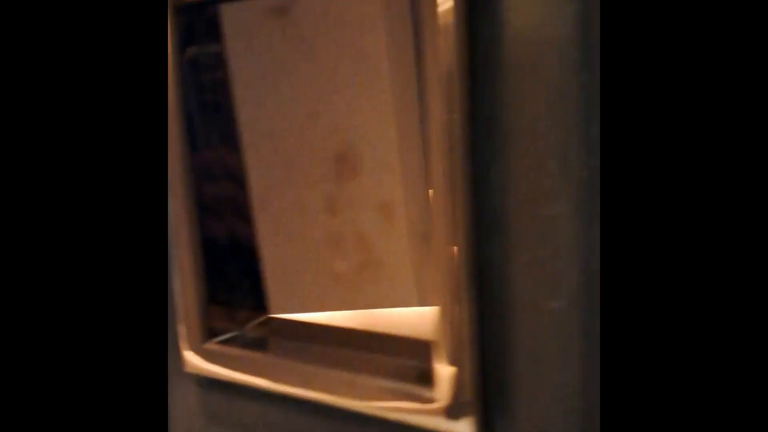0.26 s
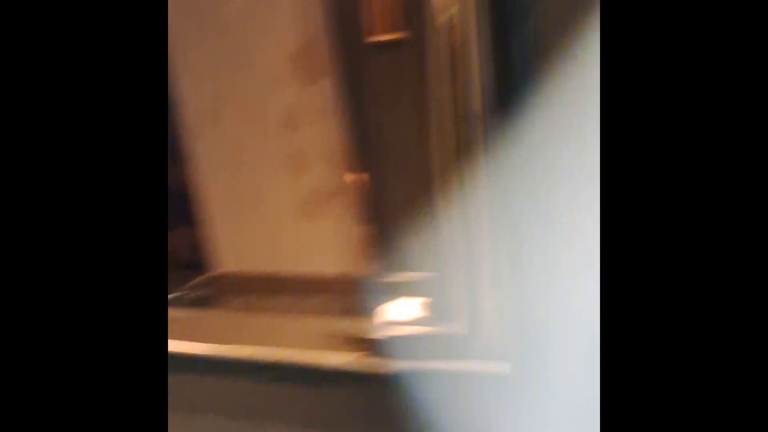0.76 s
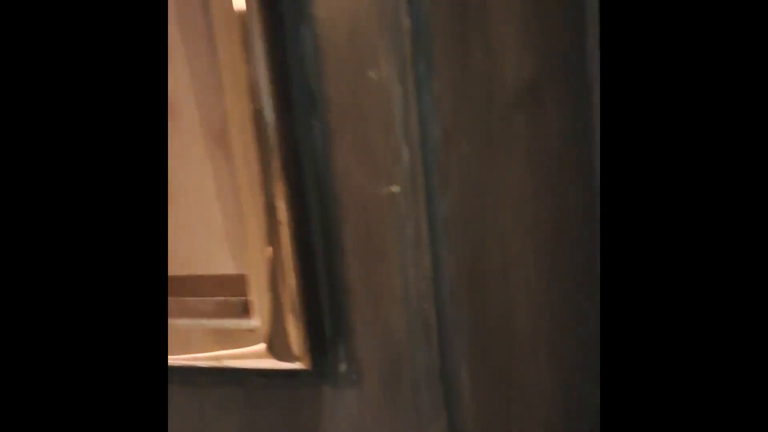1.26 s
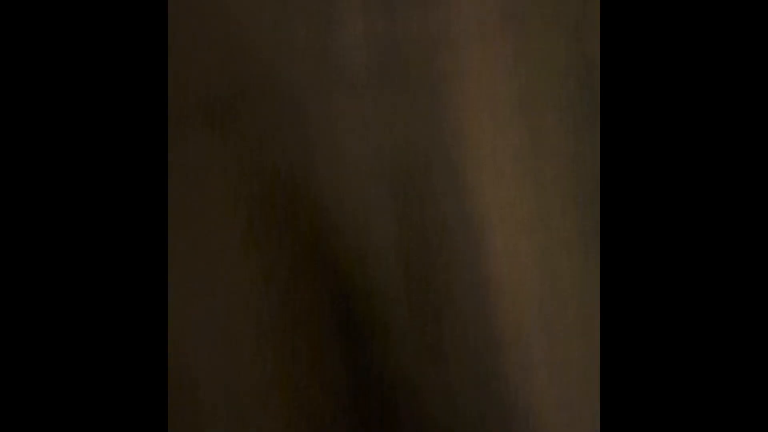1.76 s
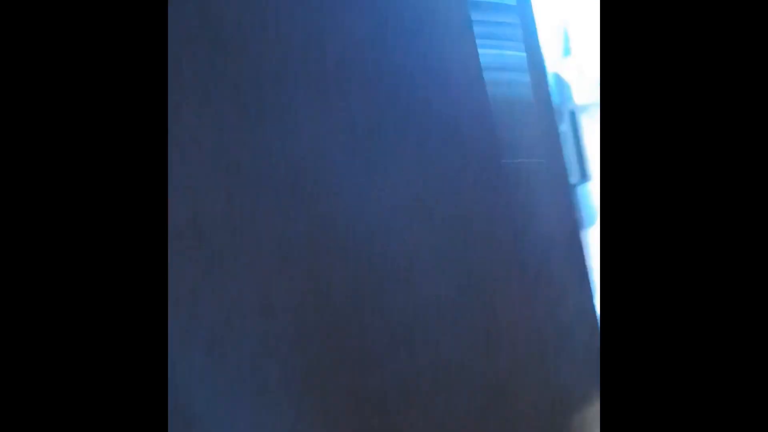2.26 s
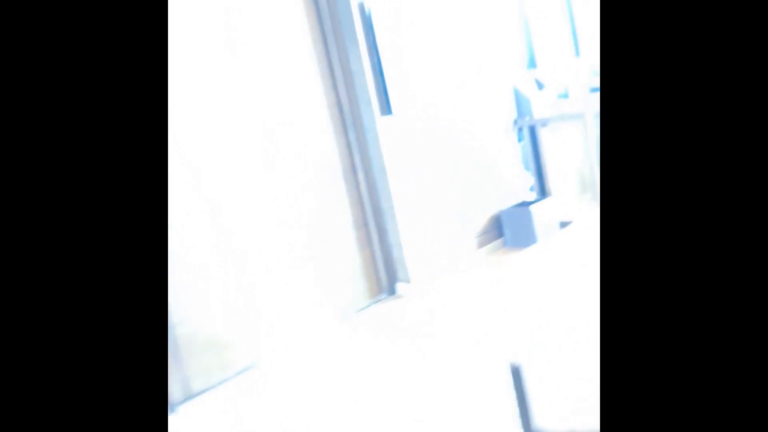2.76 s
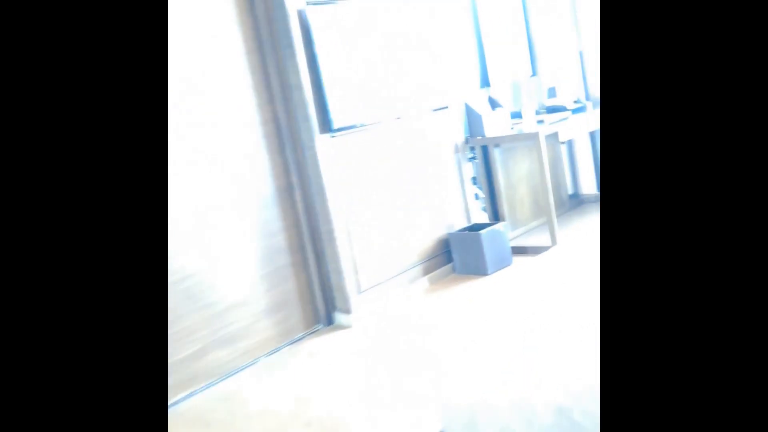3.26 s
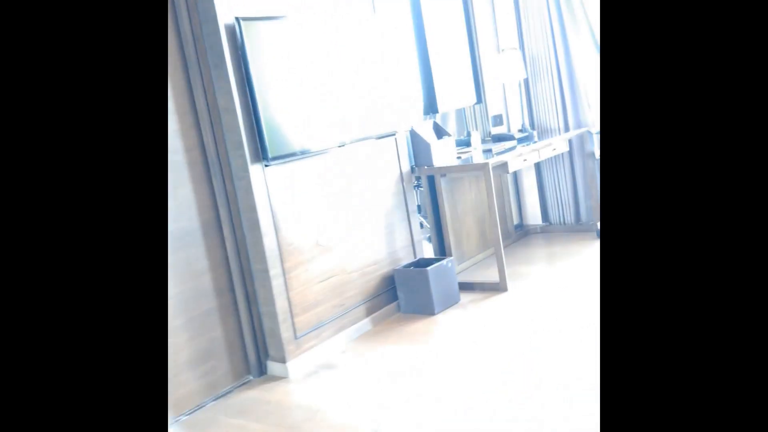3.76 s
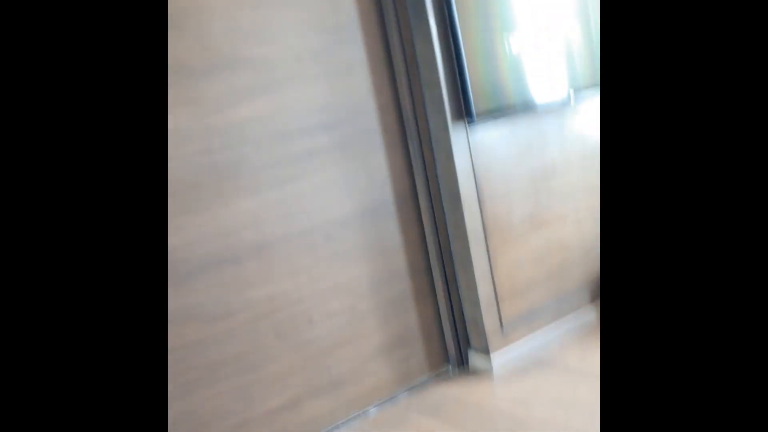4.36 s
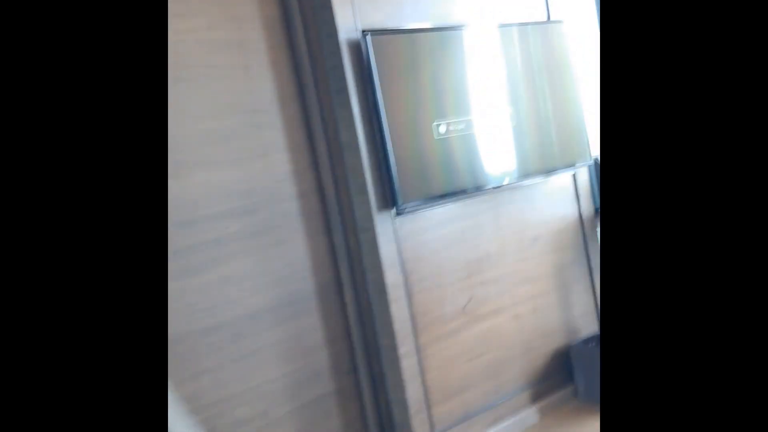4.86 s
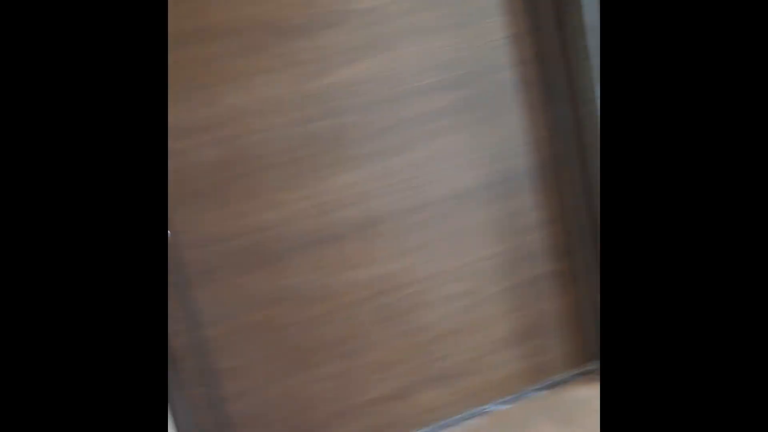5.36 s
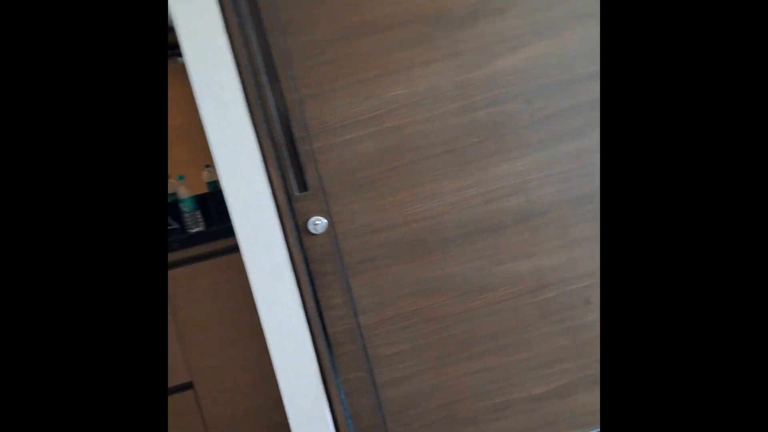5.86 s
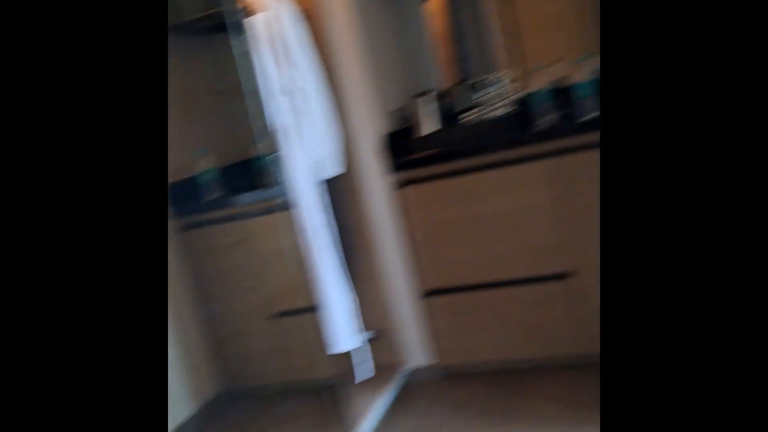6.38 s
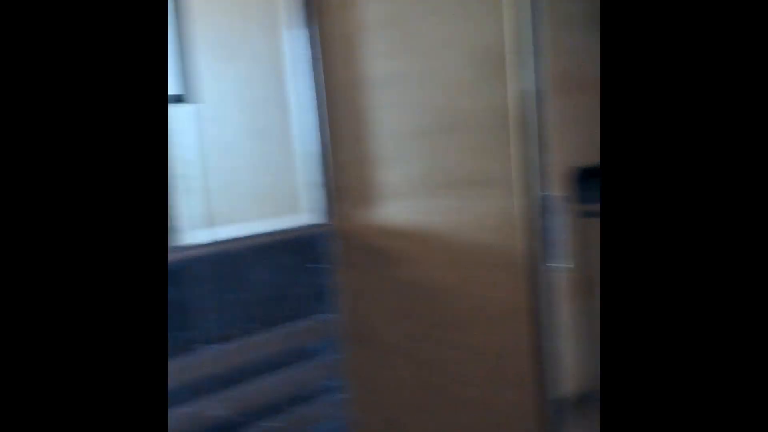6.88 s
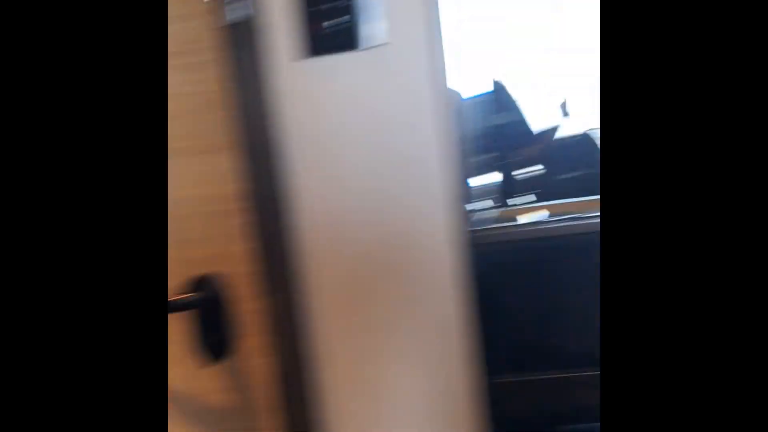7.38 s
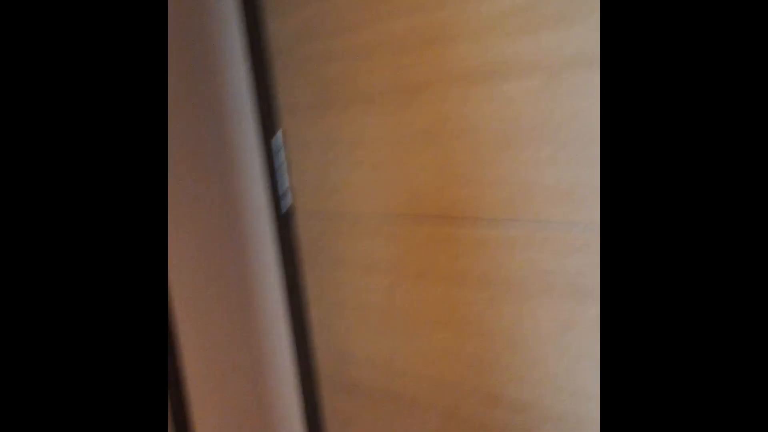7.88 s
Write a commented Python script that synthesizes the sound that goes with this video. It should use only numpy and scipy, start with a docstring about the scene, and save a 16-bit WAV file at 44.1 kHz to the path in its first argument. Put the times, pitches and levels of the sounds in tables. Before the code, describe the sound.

Close to the microphone, a wooden cupboard door taps, then bumps its frame in a fast rattling cluster with a small metallic ping. Hollow knocks and short glides follow, then a latch clack amid low wind buffets. Soft soles scuff and step on a wooden floor. Farther off, a large door rumbles along its track and slams in several hard, ringing clacks. Quiet room, low ventilation hum, moderate reverberation.

```python
"""Wooden cupboard doors slide and shut in a quiet room, heard from a camera carried by someone walking.
A near door glides, rattles and bumps home; a large one rolls along its track and clacks against its stop.
Soft soles scuff the floor, and moving air buffets the camera's two microphone ports.
Rubs and gusts are shaped noise that swells, holds and dies away; blows are short noise bursts,
thuds and ringing modes, with more room sound the farther off they are."""
import sys
import numpy as np
from scipy import signal
from scipy.fft import rfft, irfft, next_fast_len
from scipy.io import wavfile
from scipy.ndimage import uniform_filter1d

SR = 44100
rng = np.random.default_rng(int(sys.argv[2]) if len(sys.argv) > 2 else 0)


def master(y):
    """Save y as 16-bit WAV."""
    cut = np.clip(np.atleast_2d(y).T, -1, 1)
    pcm = np.round(cut * 32767)  # scale
    wavfile.write(sys.argv[1], SR, pcm.astype(np.int16))


N = 358533  # samples
RING_SIZE = 24576  # samples for a blow to die away
RIGHT_LAG = 735  # samples by which the right channel is late
EDGE_HZ = 16050  # upper band limit

# Ventilation noise as the camera moves about [t/s, level/dB], and its spectrum [f/Hz, dB per Hz]
VENT_LEVEL = [(0, -58.5), (.8, -67.5), (2.3, -55.5), (7.6, -56), (8.13, -59.5)]
VENT_SPECTRUM = [(56, -39.5), (95, -15), (126, -3), (156, -7.5), (185, -5.5), (260, -13.5), (296, -6.5),
                 (383, -14), (417, -11), (588, -18), (729, -27.5), (865, -26.5), (3130, -42),
                 (16000, -43.5)]
# Deep building rumble [t/s, level/dB], and its spectrum [f/Hz, dB per Hz]
RUMBLE_LEVEL = [(0, -62.5), (2, -54), (4.2, -64), (7.75, -61.5), (7.9, -79)]
RUMBLE_SPECTRUM = [(15, -38), (35, -17), (58, -11.5), (80, -11), (130, -23), (400, -62.5)]
# Room decay [f/Hz, t60/s]
ROOM_DECAY = [(60, 0.62), (250, 0.49), (700, 0.46), (2000, 0.44), (5000, 0.44), (7700, 0.42), (10000, 0.42),
              (16000, .34)]
# Likeness of diffuse sound at the two ports [f/Hz, left-right likeness]
PORT_LIKENESS = [(50, 0.65), (220, 0.9), (450, 0.79), (850, 0.14), (1500, 0.0067)]
# Colour of the ports [f/Hz, L-R level/dB]
PORT_BALANCE = [(50, -1.5), (250, 0.5), (550, -0.5), (1200, -5), (2300, -3.5), (4500, -1), (8000, -2.5),
                (13000, -1)]
# From the camera to what is struck [t/s, distance/m]
STRIKE_DISTANCE = [(.4, 0.93), (1.85, 0.39), (2.8, 1.24), (4.5, 1.8), (7.1, 2.8)]

# Air on the ports [t/s at full strength, hold/s, level/dB, L-R level/dB, gain of the deep part/dB]
GUST_TIMES = [(2.479, 0.036, -21, 38, -7), (2.6, 0.031, -29.5, 21, 3), (2.68, 0.075, -25.5, -2, -5.5),
              (2.806, 0.082, -32.5, -4, -3), (3.133, 0.026, -37, -7, 2.5), (3.274, 0.037, -38.5, 1.5, 2),
              (3.339, 0.042, -22, -12.5, -26), (3.473, 0.11, -30.5, -2.5, -2.5),
              (3.654, 0.035, -45, -17, 5.5)]
# Spectrum of the gusts [f/Hz, dB per Hz]
GUST_SPECTRUM = [(15, -51), (25, -42), (59, 1.5), (147, -6.5), (210, -17.5), (246, -15.5), (285, -21.5),
                 (392, -27), (600, -42.5), (780, -54), (1320, -120)]
# Soft low bumps: the hand on the camera, and at 6.21 s a thud of the rolling door
# [t/s at the peak, peak level/dB, f/Hz, half length/s]
SOFT_BUMPS = [(1.129, -31.5, 112, 0.0064), (1.135, -41, 56, 0.028), (1.28, -32.5, 208, 0.00068),
              (6.21, -42, 173, 0.0077)]

# Brushes of skin and cloth [t/s at full pressure, hold/s, level/dB, hiss above the level/dB]
CLOTH_BRUSHES = [(.95, 0.11, -65.5, -6), (1.23, 0.0062, -67, 25), (4.722, 0.0058, -40.5, -4.5),
                 (4.965, 0.019, -52, -5.5), (6.605, 0.021, -47, -1.5)]
# Spectrum of a brush [f/Hz, dB per Hz]
CLOTH_SPECTRUM = [(500, -7), (2000, -7), (4200, -8), (7000, -5), (14000, -7), (16000, -16)]
# Scuffs of soles on the floor, and at 2.663 s a faint rub as the near door's glide ends
# [t/s at full pressure, hold/s, level/dB, hiss above the level/dB, resonance f/Hz, its height/dB]
SCUFF_STROKES = [(0.05, 0.02, -44.5, -14.5, 1310, 6.5), (2.663, 0.1, -58, -9, 1800, 6),
                 (3.179, 0.0069, -53, -7.5, 1980, 10.5), (3.304, 0.042, -64, 0, 2050, 30),
                 (3.366, 0.038, -43.5, -7, 1940, 19.5), (3.426, 0.0072, -39, -9.5, 1040, 18),
                 (3.585, 0.014, -49, -24, 706, 7), (3.612, 0.018, -45, -6.5, 2840, 7.5),
                 (4.112, 0.15, -56, -18, 1780, 0), (4.275, 0.027, -44.5, -15.5, 1400, 0),
                 (4.67, 0.023, -45.5, -16, 1900, -3), (4.795, 0.06, -46.5, -9.5, 2050, 8),
                 (5.447, 0.06, -49, -16, 1660, 8), (6.607, 0.042, -46.5, -20, 1200, 10),
                 (7.749, 0.083, -46.5, -11, 2480, 2), (7.92, 0.028, -47, -6, 2670, 10.5)]
# Spectrum of a scuff [f/Hz, dB per Hz]
SCUFF_SPECTRUM = [(120, -36), (200, -25.5), (232, 0), (268, -2), (299, -0.5), (334, -0.5), (416, -2.5),
                  (763, -7.5), (2250, -10.5), (5840, -26.5), (12600, -29.5), (16000, -49)]
# Footfalls [t/s, level/dB, bass/dB, treble/dB, hardness of the snap/dB, thud of the wood/dB]
FOOTFALLS = [(3.435, -53, -4, -14, 0, -14), (3.598, -46, -6, 1, 9, -14), (4.239, -36.5, -1, -28, 12, -4),
             (4.637, -33, 7, -3, 3, -6), (4.757, -31, 5, -4, 5, -8)]
# Floorboard under the foot: spectrum [f/Hz, dB per Hz] and modes [f/Hz, level/dB, t60/s]
FLOOR_SPECTRUM = [(35, -41), (60, -21), (79, -28.5), (118, -27), (207, -4), (354, 6), (785, -3.5),
                  (2140, -11), (12400, -29), (16000, -53)]
FLOORBOARD_MODES = [(350, -16, 0.14), (469, 2, 0.097), (562, 7, 0.14)]

# Doors with metal fittings: near door's latch about 2.8 s, large door from 6.9 s
# [t/s, level/dB, bass/dB, treble/dB, hardness of the snap/dB, thud/dB]
DOOR_CLACKS = [(2.751, -27.5, 3, -15, -1, -10), (2.808, -22, -11, -10, -5, -14),
               (2.8225, -25, -6, 26, -9, -15), (2.828, -28.5, 8, 8.5, 8, -3.5),
               (6.947, -27, 1, 0.5, 2.5, -25), (7.071, -15.5, -1, -3, 22, -13),
               (7.076, -18.5, 3.5, -3.5, 22, -15), (7.2045, -15, -2.5, -14, 17, -13.5),
               (7.2305, -13, -16.5, -7, 20, -30), (7.246, -13, -13, -2.5, 0, -20),
               (7.2535, -14, 5.5, 0, 17, -3.5), (7.26, -19, 1.5, 5.5, 21, -13.5),
               (7.288, -26, 24, -2, -4, -25)]
# Fittings: spectrum [f/Hz, dB per Hz] and resonances [f/Hz, width/Hz, level/dB]
FITTING_SPECTRUM = [(29, -56), (50, -7), (125, -4), (252, -4.5), (353, -2), (495, -6.5), (1070, -8.5),
                    (1500, -9.5), (2010, -10), (2380, -9.5), (5400, -13.5), (7570, -20.5), (9180, -20),
                    (11700, -13.5), (16000, -24)]
FITTING_RESONANCES = [(890, 51, 0.43), (1990, 200, 4.7), (2820, 240, 2), (3660, 750, 4.4), (4260, 560, 1.8),
                      (7690, 1430, 12.8)]
# Modes of a door with fittings [f/Hz, level/dB, t60/s]
DOOR_MODES = [(121, 2.5, 0.39), (157, -14, 0.69), (227, -15, .35), (298, -1, 0.31), (371.6, -3, 0.38),
              (673, 3.5, 0.28), (1093, -2.5, 0.5), (1352, 4.5, 0.25), (2023, -3, 0.13), (1998, 2.5, 0.16),
              (2236, 1, 0.29), (2490, 0, 0.25), (4500, -2, 0.22), (7520, -10, 0.37)]
# Large door rolling on its track, a curve [t/s, level/dB, hiss above the level/dB]
ROLL_CURVE = [(5.3, -100, -26), (5.65, -62.5, -13), (5.69, -60, -2), (5.78, -53, -6), (5.87, -44.5, -16),
              (6.0, -48, -14), (6.1, -44, -11), (6.19, -45, -14.5), (6.29, -46.5, -10), (6.38, -46, -11),
              (6.5, -46, -12.5), (6.66, -49.5, -3), (6.8, -54.5, -8.5), (6.95, -62, -6), (7.2, -95, -8)]
# Rolling door: spectrum [f/Hz, dB per Hz] and resonances [f/Hz, width/Hz, level/dB]
TRACK_SPECTRUM = [(35, -43.5), (60, -13), (113, 2), (146, -10.5), (176, 2), (268, -3.5), (301, -7.5),
                  (330, -0.5), (636, -7.5), (1200, -8), (6580, -20.5), (14900, -24), (16000, -32)]
TRACK_RESONANCES = [(122, 17, 8), (183.6, 5, 3), (301.6, 48, 10), (357, 18, -2.5)]
# Rollers ticking over specks in the track [t/s, level/dB]
SPECK_TICKS = [(5.934, -46), (5.981, -48), (6.283, -47), (6.409, -46), (6.775, -50)]
# Thin squeal of a roller, one row [t/s, hold/s, level/dB, f/Hz, width/Hz]
ROLLER_SQUEAL = (5.51, .38, -70, 13000, 450)
# Doors scraping their frame or catch around the moment they strike
# [t/s at full pressure, hold/s, level/dB, hiss above the level/dB, change of level/dB per s]
CATCH_SCRAPES = [(.335, 0.007, -46.5, -26, 0), (1.628, 0.014, -45, -17, 0), (1.692, 0.016, -29, -18, -1.5),
                 (2.752, 0.053, -38, -5.5, -120), (6.968, 0.13, -33.5, -5.5, -110)]
# Pings of the metal catch [t/s, peak level/dB, f/Hz, t60/s]
CATCH_PINGS = [(1.692, -31.5, 7650, 0.13), (1.703, -28.5, 3576, 0.18)]

# Fingertip ticks [t/s, level/dB]
FINGER_TICKS = [(.576, -57.5), (.611, -53.5), (.636, -59), (1.114, -39.5), (1.13, -47.5), (1.586, -44.5)]
# Hollow knocks of the door settling [t/s, level/dB]
HOLLOW_TOCKS = [(2.048, -39), (2.0657, -32), (2.075, -30.5), (2.0796, -22)]
# Hollow knock: spectrum [f/Hz, dB per Hz] and modes [f/Hz, level/dB, t60/s]
HOLLOW_SPECTRUM = [(100, -17), (600, -10), (1100, -0.5), (1900, -11.5), (3000, -20.5), (5000, -23.5),
                   (16000, -45)]
HOLLOW_MODES = [(170, -48, 0.52), (1150, 4, 0.022), (1240, 6, 0.0088), (1800, 15, 0.0051)]
# Near door gliding [t/s at full pressure, hold/s, level/dB, hiss above the level/dB,
# change of level while it slides/dB per s]
NEAR_GLIDES = [(1.22, 0.35, -65.5, 10, 3), (1.945, 0.035, -40.5, -3.5, -8), (2.07, 0.084, -49.5, 0, -70),
               (2.27, 0.085, -52, -8.5, -14), (2.45, 0.081, -52.5, -14, -25)]
# Spectrum of a glide [f/Hz, dB per Hz]
RUNNER_SPECTRUM = [(150, -34.5), (350, 9.5), (650, -10), (1000, 0.5), (2000, 1.5), (3000, -10.5),
                   (6000, -26), (12500, -28.5), (16000, -40.5)]
# Resonances, one list a glide as the gap behind the door changes [f/Hz, width/Hz, level/dB]
RUNNER_RESONANCES = [
    [(1180, 450, 5.5), (2270, 200, 2.5), (4140, 1300, 2.7)],
    [(1930, 490, 5.2), (4400, 900, 4.3), (6530, 1900, 8)],
    [(1600, 900, 4.4), (4300, 1400, 3.4)],
    [(926, 170, 15), (1986, 96, 11), (3160, 820, 7)],
    [(894, 230, 14), (2110, 170, 13), (3400, 450, 11)],
]
# Near door against its frame [t/s, level/dB, bass/dB, treble/dB, hardness of the snap/dB, thud/dB]
NEAR_KNOCKS = [(.341, -34.5, -11, 5.5, 6, -18), (.359, -34, -2, -26, -13, -19),
               (.426, -39.5, -2, -52, -6, -22), (1.543, -42, 4, 3, -3, -5.5),
               (1.618, -34.5, 1, -15, -5.5, -12), (1.692, -30.5, 2.5, 5.5, 0.5, -13),
               (1.7, -22, -13, -7.5, 8.5, -11), (1.749, -25, 3, 7.5, 1.5, -12.5),
               (1.769, -27, 2.5, -1.5, -2, -12), (1.7805, -21, -1.5, -1.5, 6, -3),
               (1.804, -21.5, -3.5, -3, 16.5, -15.5), (1.8125, -17.5, -2.5, 0, -0.5, -12.5),
               (1.8315, -15.5, -19, -3, 9.5, -13.5), (1.8335, -15.5, -15, -7, 11.5, -12),
               (1.839, -20, 3.5, -8, 8, -3.5)]
# Wood of the near door: spectrum [f/Hz, dB per Hz] and resonances [f/Hz, width/Hz, level/dB]
WOOD_SPECTRUM = [(29, -29.5), (50, -5.5), (175, -4.5), (213, -9), (298, -3), (337, -3.5), (507, -9),
                 (765, -9), (1400, -12.5), (2010, -10), (2810, -14.5), (5020, -20), (6240, -27),
                 (12000, -31), (16000, -38.5)]
WOOD_RESONANCES = [(670, 130, -3), (1170, 120, 1), (1860, 230, 0), (2370, 720, 2.5), (3550, 410, 0.5),
                   (7800, 2000, 4)]
# Modes of the near door's panel [f/Hz, level/dB, t60/s]
PANEL_MODES = [(126.3, -7.5, 0.44), (168, -5, 1), (250, -5, .2), (304.4, -11.5, 0.19), (327, -9, 0.29),
               (650, 4.5, 0.12), (1800, 4, 0.098), (2070, 5.5, 0.12), (2500, -6.5, 0.11)]


def amp(db):
    """Decibels to gain."""
    return 10 ** (np.asarray(db) / 20)


def evened(x):
    """Scales to rms 1."""
    return x / np.sqrt(np.mean(x ** 2) + 1e-20)


def blow(x):
    """Scales to the energy of 10 ms at rms 1, averaged over the channels."""
    return x * np.sqrt(SR / 100 / np.sum(x ** 2, -1).mean())


def read(points, hz):
    """Reads a table on a log-frequency axis."""
    f, value = np.transpose(points)
    return np.interp(np.log(hz + 1), np.log(f + 1), value)


def follow(rows):
    """A curve at every sample."""
    return np.interp(np.arange(N) / SR, *np.transpose(rows))


def sides(pan_db):
    """Left and right gains of constant power, pan_db apart."""
    gains = amp(np.array([pan_db, -pan_db]).reshape(2, -1) / 2)
    return gains / np.sqrt((amp(pan_db) + amp(-pan_db)) / 2)


def add(mix, s, sound):
    """Mixes a sound in at time s."""
    part = mix[:, round(s * SR):][:, :sound.shape[-1]]
    part += sound[..., :part.shape[1]]


def colour(x, db_at):
    """Causal minimum-phase filter with the gain db_at(Hz), floored at -100 dB."""
    size = next_fast_len(x.shape[-1] + 4096)
    gain_db = np.maximum(db_at(abs(np.fft.fftfreq(size, 1 / SR))), -100)
    response = np.exp(signal.hilbert(np.log(amp(gain_db))).conj())
    return np.fft.ifft(np.fft.fft(x, size) * response).real[..., :x.shape[-1]]


def band(x, kind, edge_hz):
    """Third-order low or high part of a sound."""
    return signal.sosfilt(signal.butter(3, edge_hz, kind, fs=SR, output="sos"), x)


def diffuse(size):
    """Noise from all around: alike at both ports in the bass, unrelated in the treble."""
    full = next_fast_len(size)
    a, b = rfft(rng.standard_normal((2, full)))
    same = np.clip(read(PORT_LIKENESS, np.fft.rfftfreq(full, 1 / SR)), -1, 1)
    right = same * a + np.sqrt(1 - same ** 2) * b
    return irfft(np.array([a, right]), full)[:, :size]


def waver(per_s, size=N):
    """Smooth, bounded chance of rms about 1."""
    knots = np.arange(0, size / SR + 1, 1 / per_s)
    curve = np.interp(np.arange(size) / SR, knots, rng.standard_normal(len(knots)))
    return 2 * np.tanh(evened(curve) / 2) / .85


def stroke(s, hold, rise_db_per_s, fall_db_per_s, drift_db_per_s=0, size=N, knee_db=2.0):
    """Gain that swells until s, holds, then dies away, with rounded shoulders."""
    t = np.arange(size) / SR - s

    def below(db):
        return knee_db * np.logaddexp(0, db / knee_db)

    drift = drift_db_per_s * np.clip(t, 0, hold)
    db = drift - below(-rise_db_per_s * t) - below(fall_db_per_s * (t - hold))
    return amp(np.maximum(db, -120))


def peaked(spectrum, peaks):
    """A spectrum with its main resonances and a ripple of many small ones, as a function of Hz."""
    grid = np.arange(0, SR / 2, 80)
    ripple = 2.1 * rng.standard_normal(len(grid)) * np.minimum(grid / 700, 1)

    def db_at(hz):
        resonances = sum(db / (1 + (2 * (hz - f) / width) ** 2) for f, width, db in peaks)
        return read(spectrum, hz) + np.interp(hz, grid, ripple) + resonances

    return db_at


def room_tail(rise_s=0.0017):
    """Reflections build up, then each band dies at its own speed."""
    hz, t, z = signal.stft(diffuse(RING_SIZE), SR, nperseg=256)
    decay = amp(-60 * t / read(ROOM_DECAY, hz)[:, None])
    tail = signal.istft(z * decay, SR, nperseg=256)[1][:, :RING_SIZE]
    return tail * (1 - np.exp(-np.arange(RING_SIZE) / SR / rise_s))


def echo(x):
    """The room's answer, of about the same energy as x."""
    tail = room_tail()
    return signal.fftconvolve(x, tail / np.linalg.norm(tail[0]), axes=1)[:, :x.shape[1]]


def ring(modes, spread_hz=900):
    """Damped modes; the higher ones reach the two ports more out of step."""
    t = np.arange(RING_SIZE) / SR
    out = 0
    for hz, db, t60 in modes:
        phase = min(hz / spread_hz, 2) * rng.uniform(-0.23, 1, (2, 1))
        out = out + amp(db - 60 * t / t60) * np.sin(2 * np.pi * hz * t + phase)
    return out


def toned(rows, bass_db, treble_db, snap_db):
    """Gives one tone, with no thud, to a set of like contacts."""
    return [(s, db, bass_db, treble_db, snap_db, -np.inf) for s, db in rows]


def hits(rows, spectrum, peaks, modes, ring_db, pan_db, grain_db, attack_s, rattle_t60, room_db,
         snap_s=0.0072, strike_db=-14, thud_hz=450, thud_t60=.04, room_rise_s=0.0015,
         bass_hz=450, treble_hz=4500):
    """Sharp strike, snap and grainy rattle; a thud and modes ring, and the room fills (room_db: at 1 m)."""
    out, t = np.zeros((2, N)), np.arange(RING_SIZE) / SR
    strike = amp(strike_db) * blow(signal.unit_impulse(RING_SIZE))
    onset = 1 - np.exp(-t / attack_s)  # soft things take longer to press home
    for s, db, bass_db, treble_db, snap_db, thud_db in rows:
        grains = evened(amp(grain_db * waver(2200, RING_SIZE)))
        rattle = grains * amp(-60 * t / rattle_t60)
        snap = amp(snap_db) * np.exp(-t / snap_s)
        crack = blow(diffuse(RING_SIZE) * (rattle + snap))
        wet = amp(room_db) * np.interp(s, *np.transpose(STRIKE_DISTANCE))  # in proportion to distance
        contact = strike + onset * (crack + wet * blow(room_tail(room_rise_s)))
        body = blow(colour(contact, peaked(spectrum, peaks)))
        thud = amp(thud_db) * blow(ring([(thud_hz * rng.uniform(.92, 1.08), 0, thud_t60)]))
        ringing = amp(ring_db) * blow(ring(modes))

        def tone(hz):
            bass = bass_db / (1 + (hz / bass_hz) ** 2)
            return bass + treble_db / (1 + (treble_hz / (hz + 1)) ** 4)

        add(out, s, amp(db) * blow(colour(body + onset * (thud + ringing), tone)))
    return out * sides(pan_db)


def wander(x, patchy_db=2.5):
    """Resonances come and go as the point of contact moves."""
    z = signal.stft(x, nperseg=512)[2]
    patches = uniform_filter1d(rng.standard_normal(z.shape[1:]), size=7, axis=1)  # along time
    patches = evened(uniform_filter1d(patches, size=4, axis=0))  # along frequency
    return signal.istft(z * amp(patchy_db * patches), nperseg=512)[1][:, :x.shape[1]]


def slips(db_at, uneven_db, grain_db, size, split_hz=4500):
    """Tiny slips, uneven in strength, as coloured noise; returns its body and its hiss, each at rms 1."""
    strength = amp(uneven_db * waver(45, size) + grain_db * waver(1500, size))
    sound = wander(colour(diffuse(size) * strength, db_at))
    return [evened(band(sound, kind, split_hz)) for kind in ("low", "high")]


def rub(rows, spectrum, peaks, rise_db_per_s, fall_db_per_s, pan_db, uneven_db, grain_db, room_db):
    """Strokes of friction, each with its own list of resonances, and the room's answer."""
    out = np.zeros((2, N))
    for (s, hold, db, hiss_db, *drift), own_peaks in zip(rows, peaks):
        start = max(s - .35, 0)  # leaves time to swell
        body, hiss = slips(peaked(spectrum, own_peaks), uneven_db, grain_db, size=SR)
        gain = stroke(s - start, hold, rise_db_per_s, fall_db_per_s, *drift, size=SR)
        add(out, start, amp(db) * gain * sides(pan_db) * (body + amp(hiss_db) * hiss))
    return out + amp(room_db) * echo(out)


def room_air():
    """Low ventilation noise over a deep rumble, both diffuse noise."""
    vent = evened(colour(diffuse(N), lambda hz: read(VENT_SPECTRUM, hz)))
    rumble = evened(colour(diffuse(N), lambda hz: read(RUMBLE_SPECTRUM, hz)))
    return vent * amp(follow(VENT_LEVEL)) + rumble * amp(follow(RUMBLE_LEVEL))


def buffeting(lumpy_db=2.5, rise_db_per_s=500, fall_db_per_s=330, deep_hz=95):
    """Lumps of moving air push on each port separately; the share of deep eddies differs by gust."""
    eddies = colour(rng.standard_normal((2, N)), lambda hz: read(GUST_SPECTRUM, hz))
    eddies /= np.sqrt(uniform_filter1d(eddies ** 2, size=3000) + 1e-20)  # levelled over 68 ms
    deep = signal.sosfiltfilt(signal.butter(3, deep_hz, fs=SR, output="sos"), eddies)
    air = np.zeros((2, N))
    for s, hold, db, pan_db, deep_db in GUST_TIMES:
        gain = amp(db) * stroke(s, hold, rise_db_per_s, fall_db_per_s)
        air += gain * sides(pan_db) * (eddies + (amp(deep_db) - 1) * deep)
    return air * amp(lumpy_db * waver(60))


def soft_bumps(pan_db=-16):
    """Hand on the camera and one thud of the rolling door: low pushes that swell and die in a few cycles."""
    t = np.arange(N) / SR
    pushes = sum(amp(db) * np.exp(-((t - s) / half) ** 2) * np.cos(2 * np.pi * hz * (t - s))
                 for s, db, hz, half in SOFT_BUMPS)
    return sides(pan_db) * pushes


def cloth_brushes():
    """Skin and cloth brush past: quick, bright friction without main resonances."""
    return rub(CLOTH_BRUSHES, CLOTH_SPECTRUM, [[]] * len(CLOTH_BRUSHES), rise_db_per_s=850,
               fall_db_per_s=330, pan_db=1.0, uneven_db=2.0, grain_db=3.0, room_db=-8.5)


def scuffs():
    """Scuffing soles and the faint end of a glide: friction with one resonance as wide as its frequency."""
    strokes = [row[:4] for row in SCUFF_STROKES]
    resonances = [[(hz, hz, db)] for *_, hz, db in SCUFF_STROKES]
    return rub(strokes, SCUFF_SPECTRUM, resonances, rise_db_per_s=174, fall_db_per_s=198,
               pan_db=0.5, uneven_db=1.0, grain_db=1.0, room_db=-13.0)


def footsteps():
    """Footfalls press the floorboard and ring its modes."""
    return hits(FOOTFALLS, FLOOR_SPECTRUM, [], FLOORBOARD_MODES, ring_db=-3.0, pan_db=-1.0,
                grain_db=5, attack_s=0.00087, rattle_t60=0.043, room_db=-2)


def roller_squeal():
    """A roller squeals thinly: noise in a narrow band, before pan and room."""
    s, hold, db, hz, width = ROLLER_SQUEAL
    whistle = evened(colour(diffuse(N), lambda f: -20 * np.log10(1 + ((f - hz) / width) ** 2)))
    return amp(db) * whistle * stroke(s, hold, rise_db_per_s=200, fall_db_per_s=110)


def rolling(pan_db=-0.5, room_db=-10.5):
    """The large door rumbles along its track with a changing share of hiss; a roller squeals at the start."""
    body, hiss = slips(peaked(TRACK_SPECTRUM, TRACK_RESONANCES), uneven_db=1.8, grain_db=3.5, size=N)
    curve = np.array(ROLL_CURVE)
    level = amp(follow(curve[:, [0, 1]]))
    hiss_share = amp(follow(curve[:, [0, 2]]))
    direct = sides(pan_db) * (level * (body + hiss_share * hiss) + roller_squeal())
    return direct + amp(room_db) * echo(direct)


def roller_ticks():
    """Rollers tick over specks in the track and ring the fittings and the door's modes."""
    rows = toned(SPECK_TICKS, bass_db=-1, treble_db=-6, snap_db=12)
    return hits(rows, FITTING_SPECTRUM, FITTING_RESONANCES, DOOR_MODES, ring_db=-13.5, pan_db=1.0,
                grain_db=-8, attack_s=.0002, rattle_t60=.02, room_db=-7, snap_s=0.0011)


def door_clacks():
    """The near door's latch, then the large door, clack: a short snap of the fittings and ringing modes."""
    return hits(DOOR_CLACKS, FITTING_SPECTRUM, FITTING_RESONANCES, DOOR_MODES, ring_db=-12,
                pan_db=0.5, grain_db=5.5, attack_s=0.00029, rattle_t60=0.16, room_db=-6.5, snap_s=0.0014,
                strike_db=-10, thud_hz=1057, thud_t60=.011, room_rise_s=0.0042)


def catch_scrapes():
    """Doors scrape their frame or catch around the strike: friction coloured by the metal fittings."""
    return rub(CATCH_SCRAPES, FITTING_SPECTRUM, [FITTING_RESONANCES] * len(CATCH_SCRAPES),
               rise_db_per_s=899.0, fall_db_per_s=303.0, pan_db=0.0, uneven_db=2.5, grain_db=4, room_db=-8.0)


def catch_pings():
    """The metal catch rings briefly as the door meets it, one damped mode a ping."""
    out = np.zeros((2, N))
    for s, db, hz, t60 in CATCH_PINGS:
        add(out, s, ring([(hz, db, t60)]))
    return out


def finger_ticks():
    """Fingertips tick on the near door, with a very short rattle."""
    rows = toned(FINGER_TICKS, bass_db=11.0, treble_db=17.0, snap_db=2)
    return hits(rows, WOOD_SPECTRUM, WOOD_RESONANCES, PANEL_MODES, ring_db=-8, pan_db=-3.0,
                grain_db=9.5, attack_s=.0004, rattle_t60=.03, room_db=1.0)


def hollow_tocks():
    """The door settles with hollow knocks, ruled by strong, fast-dying modes."""
    rows = toned(HOLLOW_TOCKS, bass_db=1, treble_db=-2.0, snap_db=12)
    return hits(rows, HOLLOW_SPECTRUM, [], HOLLOW_MODES, ring_db=5.5, pan_db=1.5,
                grain_db=8.0, attack_s=0.00064, rattle_t60=0.13, room_db=-10.0)


def near_glides():
    """The near door glides: friction with the resonances of the gap behind it."""
    return rub(NEAR_GLIDES, RUNNER_SPECTRUM, RUNNER_RESONANCES, rise_db_per_s=140, fall_db_per_s=249.0,
               pan_db=0.5, uneven_db=2.5, grain_db=3, room_db=-5.0)


def near_knocks():
    """The near door bumps its frame: a snap, a low wooden thud and the panel's modes."""
    return hits(NEAR_KNOCKS, WOOD_SPECTRUM, WOOD_RESONANCES, PANEL_MODES, ring_db=-11.5, pan_db=0.5,
                grain_db=5.5, attack_s=0.00053, rattle_t60=0.12, room_db=-1, snap_s=0.0041,
                strike_db=-8.5, thud_hz=295.5, thud_t60=.07)


def scene():
    """Air, steps and doors together, from the background to the near door."""
    background = room_air() + buffeting() + soft_bumps()
    rubs_and_steps = cloth_brushes() + scuffs() + footsteps()
    track_and_fittings = rolling() + roller_ticks() + door_clacks()
    catches = catch_scrapes() + catch_pings()
    near_door = finger_ticks() + hollow_tocks() + near_glides() + near_knocks()
    return background + rubs_and_steps + track_and_fittings + catches + near_door


def record(dry):
    """Each port has its own colour, the right channel runs late, peaks round off; then the band limit."""
    left = colour(dry[0], lambda hz: read(PORT_BALANCE, hz) / 2)
    right = colour(dry[1], lambda hz: -read(PORT_BALANCE, hz) / 2)
    late = np.array([left, np.pad(right, (RIGHT_LAG, 0), "reflect")[:N]])
    rounded = late / (1 + (late / .85) ** 6) ** (1 / 6)  # stays within 0.85
    lowpass = signal.firwin(401, EDGE_HZ, window=("kaiser", 9), fs=SR)
    return signal.oaconvolve(rounded, lowpass[None], "same")


dry = scene()
out = record(dry)
master(out)
```